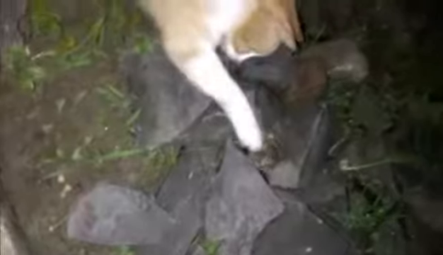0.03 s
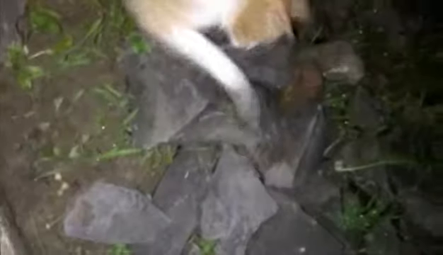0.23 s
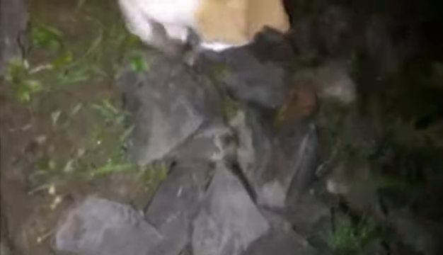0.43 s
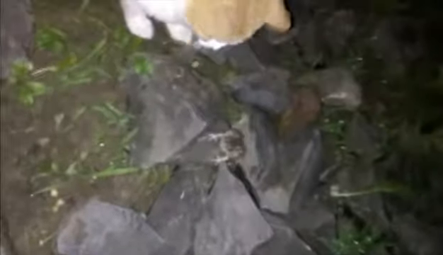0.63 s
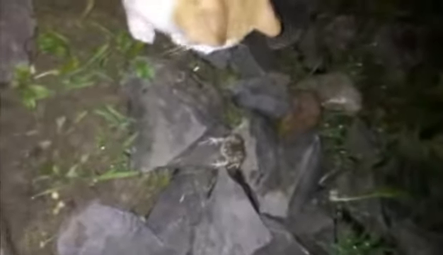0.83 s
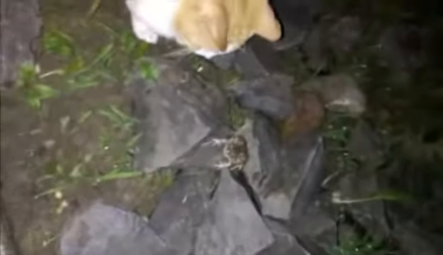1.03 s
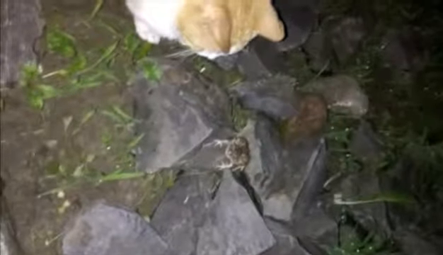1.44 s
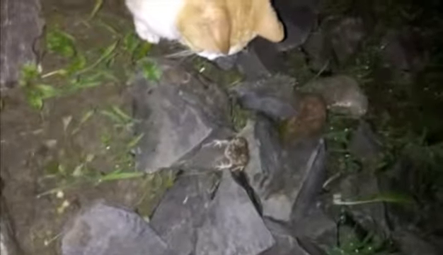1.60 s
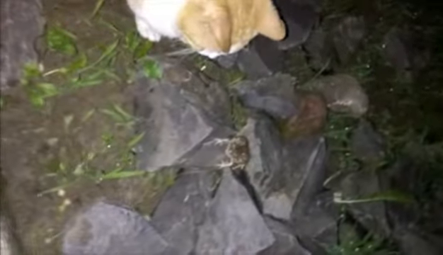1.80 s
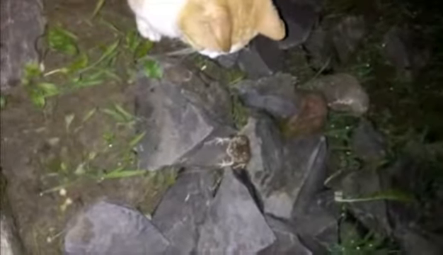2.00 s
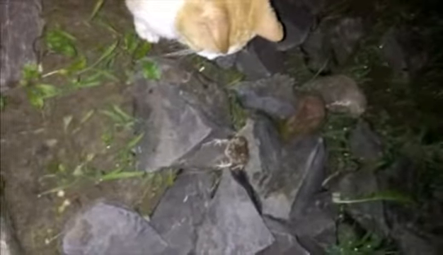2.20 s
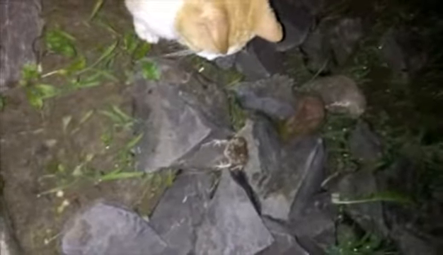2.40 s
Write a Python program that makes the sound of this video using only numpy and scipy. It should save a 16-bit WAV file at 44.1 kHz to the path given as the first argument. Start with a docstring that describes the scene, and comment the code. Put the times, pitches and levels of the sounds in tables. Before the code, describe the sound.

A frog screams in one long, high, wavering wail outdoors at night.

```python
"""A frog screams, cornered by a cat on stones at night, about a metre from a narrow-band stereo recorder.
Its larynx starts with single clicks, speeds up through a creak, breaks, and holds one long wavering wail
that rasps now and then. Throat and open mouth colour the voice, differently at each microphone.
The stones echo briefly; far off there is a low rumble and a few faint hooting tones."""
import sys
import numpy as np
from scipy import signal
from scipy.fft import rfft, irfft, next_fast_len
from scipy.io import wavfile
from scipy.ndimage import uniform_filter1d, map_coordinates

SR = 44100
rng = np.random.default_rng(int(sys.argv[2]) if len(sys.argv) > 2 else 0)


def unload_wav(signal):
    """Save mono or channel-first audio to the path in sys.argv[1] as 16-bit WAV at rate SR, clipped to [-1, 1]."""
    wavfile.write(
        sys.argv[1],
        SR,
        np.round(np.clip(np.atleast_2d(signal).T, -1, 1) * 32767).astype(np.int16),
    )


N = 112454
RECORDER_HZ = 16000  # the recorder's sampling rate


def undb(db):
    """Decibels to gain."""
    return 10 ** (np.asarray(db) / 20)


def curve(rows):
    """Join (time_s, value) points by straight lines."""
    rows = np.array(rows, float)
    return np.interp(np.arange(N) / SR, rows[:, 0], rows[:, 1])


def unit(x):
    """Scale to rms 1."""
    return x / np.sqrt(np.mean(x ** 2))


def pan(db):
    """Left and right gains, the left louder by db."""
    return undb(np.array([[db], [-db]]) / 2)


def walk(hz):
    """Smooth random drift of rms 1, up to about hz."""
    f = np.fft.rfftfreq(N, 1 / SR)
    return unit(irfft(rfft(rng.standard_normal(N)) * np.exp(-(f / hz) ** 2), N))


def colour(x, rows, column=1):
    """Minimum-phase filter through (freq_hz, gain_db) points."""
    size = 4096
    rows, f = np.array(rows, float), np.fft.rfftfreq(size, 1 / SR)
    gain_db = np.interp(np.log(f + 1), np.log(rows[:, 0]), rows[:, column])
    cepstrum = irfft(np.log(undb(gain_db)))
    cepstrum[1:size // 2] *= 2
    cepstrum[size // 2 + 1:] = 0
    return signal.fftconvolve(x, irfft(np.exp(rfft(cepstrum))))[:N]


def band(x, hz, width_hz):
    """Bell-shaped band around hz."""
    size = next_fast_len(N + N // 10)
    f = np.fft.rfftfreq(size, 1 / SR)
    return irfft(rfft(x, size) * np.exp(-((f - hz) / width_hz) ** 2), size)[:N]


def noise_band(hz, width_hz):
    """Noise of rms 1 around hz."""
    return unit(band(rng.standard_normal(N), hz, width_hz))


def delay(x, seconds):
    """Delay, to a fraction of a sample."""
    return map_coordinates(x, [np.arange(N) - seconds * SR])


def night():
    """Low murk in the distance, and a deep rumble that swells towards the end."""
    # spectrum of the murk: freq_hz, gain_db
    murk_spectrum = [(20, -20.5), (80, -4), (430, -3), (600, -9.5), (2000, -20), (8000, -36.5)]
    # course of the murk: time_s, level_db
    murk_level = [(.1, -115), (.13, -76.5), (.3, -77), (.65, -67.5), (1.15, -68.5), (1.4, -75),
                  (2.2, -72.5), (2.55, -75)]
    # course of the rumble: time_s, level_db
    rumble_level = [(.1, -120), (.3, -98), (1.4, -91.5), (2.2, -72.5), (2.55, -82)]

    def layer():
        murk = unit(colour(rng.standard_normal(N), murk_spectrum))
        murk *= undb(curve(murk_level) + 2 * walk(hz=2.6))
        return murk + noise_band(hz=96, width_hz=94) * undb(curve(rumble_level))

    mid, side = layer(), layer()
    return mid + undb(-6.5) * side * np.array([[1], [-1]])


def clicks():
    """Single snaps of the larynx; each rings the nearly closed throat with a short falling chirp."""
    # larynx snaps: start_s, relative_db, ring_hz
    snaps = [(.1418, -17, 3700), (.163, -7, 4900), (.18, -4, 5000), (.1901, -5, 4900), (.199, -6, 4700),
             (.207, -6, 4400)]
    ring_s, sag_hz_per_s = .0008, 330000
    t, out = np.arange(N) / SR, 0
    for start, db, hz in snaps:
        age = t - start
        snap = np.sinc(age * RECORDER_HZ) * (np.abs(age) < ring_s)
        since = np.maximum(age, 0)
        envelope = since / ring_s * np.exp(1 - since / ring_s)
        ring = envelope * np.sin(2 * np.pi * since * (hz - sag_hz_per_s * since / 2))
        out = out + undb(db) * (snap + undb(-12) * ring)
    return undb(-14.5) * out


def scream():
    """Larynx pulses with a puff of air in each cycle, speeding up from creak to wail."""
    # opening creak: time_s, pulse_rate_hz, relative_db
    creak = [(0.2124, 174.8, -44.5), (0.233, 204.8, -40), (.268, 201.4, -37), (0.284, 246.4, -32.5),
             (0.292, 361, -30.5), (.3, 449, -32)]
    # melody of the wail: time_s, pitch_hz
    wail = [(0.31, 544.4), (0.32, 580), (0.33, 675), (0.35, 708), (.392, 733), (0.41, 777), (0.45, 758),
            (0.51, 797), (0.63, 779.6), (0.7, 713.4), (0.75, 653.4), (0.8, 671), (0.875, 674), (.915, 612),
            (0.945, 599), (0.98, 633.4), (1.05, 705), (1.13, 675), (1.2, 669), (1.24, 695), (1.32, 645.5),
            (1.4, 696.8), (1.49, 655), (1.53, 611.3), (1.57, 618.6), (1.67, 689.5), (1.74, 652.2),
            (1.83, 662.5), (1.89, 631.8), (2.04, 625.1), (2.2, 643.8), (2.26, 601.7), (2.29, 626.7),
            (2.55, 615.4)]
    # effort of the wail: time_s, relative_db
    effort = [(0.332, -30), (0.355, -23.5), (0.385, -24.5), (0.42, -29.5), (0.71, -35), (0.8, -39),
              (0.9, -35), (0.92, -38), (1.03, -38), (1.08, -35), (1.15, -37.5), (1.19, -40.5), (1.33, -37),
              (1.36, -41), (1.41, -36), (1.43, -40), (1.5, -35), (1.54, -42), (1.7, -40), (2.14, -40),
              (2.21, -37), (2.24, -42), (2.47, -41), (2.55, -45)]
    # roughness of the voice: time_s, amount (0-1)
    roughness = [(.21, .6), (.275, .3), (.295, 1), (.33, .45), (.35, .08), (.82, .02), (.93, .2),
                 (1.02, .04)]
    # every other pulse comes early, adding tones between the harmonics: time_s, shift_cycles
    pulse_shift = [(.35, .0005), (.6, .0026), (.87, .0022), (1.05, .001), (1.115, .004), (1.18, .001),
                   (1.24, .006), (1.33, .0003), (1.46, .0025), (1.6, .0012)]
    quiver_start_s, quiver_hz, quiver_depth, quiver_db = 1.906, 13.3, .011, 1.6  # the voice tires
    split_full_hz, flicker_db, shimmer_db, voice_db = 4500, 1.3, .9, 6.5
    t, creak, top_hz = np.arange(N) / SR, np.array(creak), RECORDER_HZ / 2
    rough = np.clip(curve(roughness), 0, 1)
    quiver = np.sin(2 * np.pi * quiver_hz * np.maximum(t - quiver_start_s, 0))
    flutter = .0025 * walk(hz=30)
    jitter = .04 * rough * walk(hz=440)
    pitch_hz = uniform_filter1d(curve(np.vstack([creak[:, :2], wail])), size=400)
    pitch_hz *= 1 + quiver_depth * quiver + flutter + jitter
    cycles = np.cumsum(pitch_hz) / SR
    cycles = np.maximum(cycles - np.interp(creak[0, 0], t, cycles), -.5)  # first pulse opens the creak
    phase = 2 * np.pi * cycles
    split = curve(pulse_shift) * (1 + .65 * walk(hz=35)) * np.cos(np.pi * cycles)
    pulses = 0
    for k in range(1, 46):
        upper = np.clip(2 * k * pitch_hz / split_full_hz - 1, 0, 1)  # only upper harmonics split
        flicker = undb(flicker_db * walk(hz=22)) if 5 < k < 13 else 1
        in_band = np.clip((top_hz - k * pitch_hz) / 200, 0, 1)
        pulses += np.cos(k * (phase + 2 * np.pi * split * upper)) * flicker * in_band
    pulses *= np.sqrt(2 * pitch_hz / top_hz)  # same power at any pitch
    puffs = rough * undb(-16) * noise_band(hz=6270, width_hz=1200) * (1 + np.cos(phase))
    level_db = curve(np.vstack([creak[:, ::2], effort])) + voice_db
    level_db += quiver_db * quiver + shimmer_db * walk(hz=35)
    onset = np.clip(2 * cycles + 1, 0, 1)
    return (pulses + puffs) * undb(level_db) * onset


def mouth(voice):
    """Resonances of the throat and open mouth swell and fade as the frog screams."""
    # throat resonance, strongest as the voice breaks: time_s, lift_db
    throat = [(.21, 7.5), (.28, -2.5), (.312, 14.5), (.35, -1.5), (.62, -3.5), (.8, -2), (1.5, -2),
              (2.2, -1.5), (2.55, 0.5)]
    # lowest harmonics: time_s, lift_db
    body = [(.21, 6.5), (.31, 1), (.37, -5), (.62, 2), (.8, 3), (.94, -1.5), (1.2, 1), (1.7, 1),
            (2.55, -1.5)]
    # shrill upper resonance of the mouth: time_s, lift_db
    shrill = [(.2, 6.5), (.24, 8.5), (.3, 2), (.45, -11.5), (.8, -2.5), (1.8, -0.5), (2.55, -1.5)]
    for lift, hz, width_hz in (throat, 3540, 1900), (body, 1115, 1115), (shrill, 5650, 220):
        voice = voice + (undb(curve(lift)) - 1) * band(voice, hz, width_hz)
    return voice


def microphones(voice):
    """The voice from a metre away: each microphone hears its own colour, the left a little later."""
    # mouth and stones as heard at the microphones: freq_hz, left_db, right_db
    response = [(100, -72, -97), (560, -29, -30), (825, -20, -30), (1329, -20.5, -11.5),
                (1560, -17.5, -10.5), (2020, -15.5, -11), (2530, -13.5, -17.5), (2690, -21.5, -6),
                (3092, -7.5, -3), (3413, -7, -17.5), (3750, -16, -12), (4404, -7, -7), (4746, -15, -6.5),
                (5520, 6, -1), (5500, -11.5, 3), (6440, -2.5, 6.5), (6806, -28.5, 7), (7160, 2.5, 2),
                (8650, -22.5, -9)]
    left = delay(colour(voice, response, column=1), seconds=.00004)
    right = colour(voice, response, column=2)
    # the shrillest band reaches the left microphone by way of a stone
    bounced = delay(left, seconds=.0013)
    left = left + band(bounced - left, hz=6664, width_hz=1140)
    return np.array([left, right])


def rasps():
    """Short hissing breaks in the voice, mostly at the right microphone."""
    # hisses: peak_s, half_length_s, centre_hz, width_hz, level_db
    hisses = [(0.257, 0.041, 3720, 2270, -49.5), (1.876, 0.0062, 1900, 600, -62.5),
              (2.041, 0.0075, 6960, 700, -46), (2.115, 0.0071, 7700, 694, -47.5),
              (2.204, 0.0076, 7200, 696, -54), (2.292, 0.012, 6180, 594, -47)]
    t, out = np.arange(N) / SR, 0
    for peak, half_length, hz, width_hz, db in hisses:
        envelope = np.exp(-((t - peak) / half_length) ** 2 / 2)
        out = out + undb(db) * envelope * noise_band(hz, width_hz)
    return out * pan(db=-14.5)


def stones(frog):
    """Short scattered echo from the stones and ground around the frog."""
    gap_s, t60_s = .002, .08
    age = np.arange(N // 8) / SR - gap_s
    tail = rng.standard_normal((2, len(age))) * np.exp(-np.log(1000) * age / t60_s) * (age > 0)
    tail /= np.sqrt(np.sum(tail ** 2, axis=1, keepdims=True))
    scattered = signal.fftconvolve(frog, tail, axes=1)[:, :N]
    # the nearest stone mirrors the voice, so each harmonic swells and dips as it glides
    mirrored = np.array([delay(side, seconds=.00195) for side in frog])
    return frog + undb(-23.5) * mirrored + undb(-15) * scattered


def hoots():
    """Faint gliding tones far off to the left, blurred by distance."""
    # distant hoots: start_s, length_s, first_hz, last_hz, level_db
    glides = [(0.63, 0.078, 549, 541, -72.5), (0.86, 0.12, 739, 867, -70), (1.562, 0.28, 427, 396, -69),
              (1.83, 0.265, 325.6, 255.8, -68.5), (2.43, .16, 295.5, 287, -71.5)]
    t, out = np.arange(N) / SR, 0
    for start, length, first_hz, last_hz, db in glides:
        along = np.clip((t - start) / length, 0, 1)
        pitch_hz = first_hz + (last_hz - first_hz) * along
        tone = np.exp(2j * np.pi * np.cumsum(pitch_hz) / SR)
        blur = 1 + .99 * (walk(hz=27) + 1j * walk(hz=30))  # level and phase waver
        envelope = np.sqrt(2 * np.abs(np.sin(np.pi * along)))
        out = out + undb(db) * envelope * np.real(tone * blur)
    return out * pan(db=5.5)


def scene():
    """The frog close by among the stones, the night far behind it."""
    voice = mouth(clicks() + scream())
    frog = microphones(voice) + rasps()
    return stones(frog) + hoots() + night()


def record(dry):
    """The recorder keeps sound below half its sampling rate and leaks a mirror image above it."""
    # leak of the mirror image: freq_hz, gain_db
    leak = [(8000, -5), (8500, -6.5), (9000, -15.5), (9500, -25), (10000, -44.5)]
    t, edge_hz, top_hz = np.arange(N) / SR, .49 * RECORDER_HZ, 9900
    kept = signal.sosfilt(signal.ellip(10, .2, 70, edge_hz, fs=SR, output="sos"), dry)
    analytic = signal.hilbert(kept, next_fast_len(2 * N))[:, :N]
    image = np.real(np.conj(analytic) * np.exp(2j * np.pi * RECORDER_HZ * t))  # f -> RECORDER_HZ - f
    heard = kept + np.array([colour(side, leak) for side in image])
    return signal.sosfilt(signal.ellip(10, .2, 80, top_hz, fs=SR, output="sos"), heard)


dry = scene()
out = record(dry)
unload_wav(out)
```